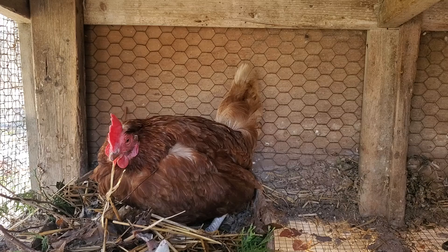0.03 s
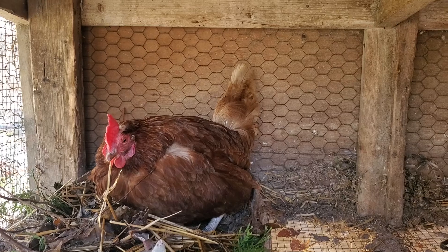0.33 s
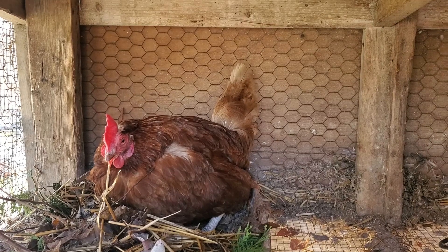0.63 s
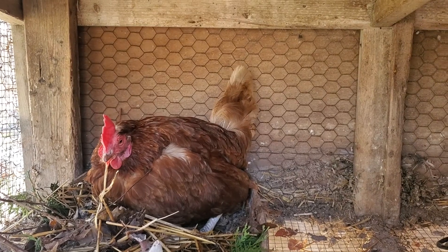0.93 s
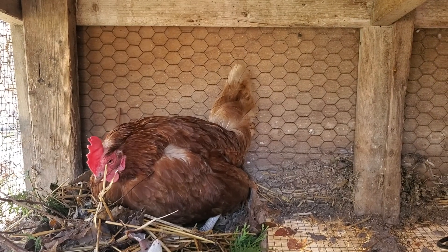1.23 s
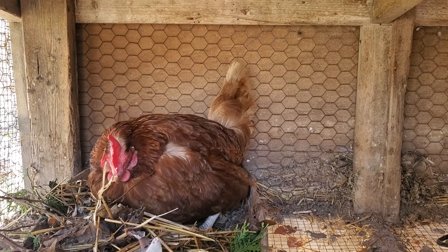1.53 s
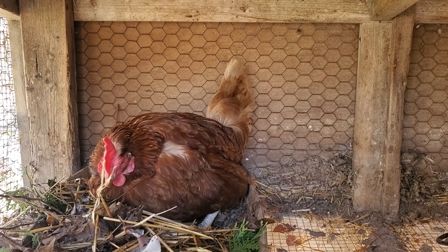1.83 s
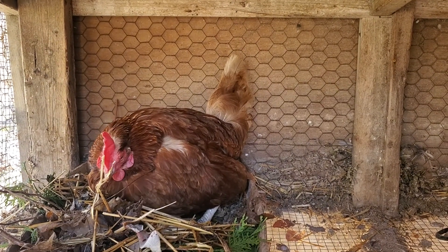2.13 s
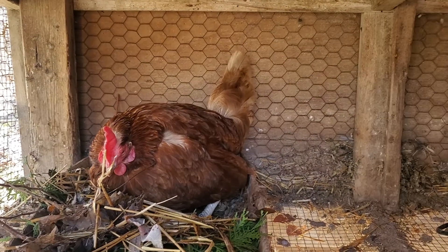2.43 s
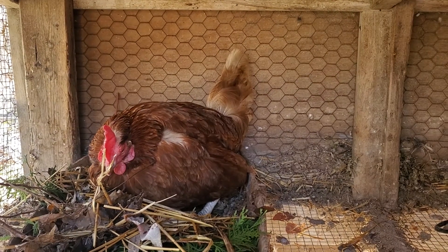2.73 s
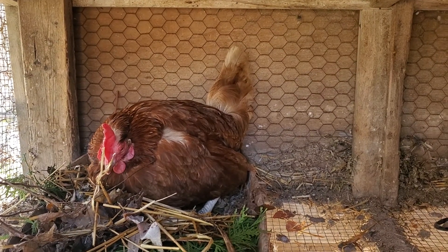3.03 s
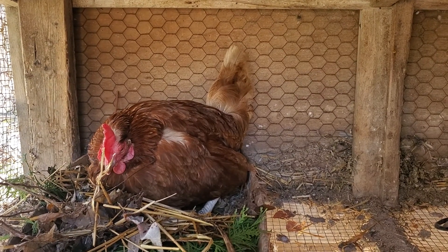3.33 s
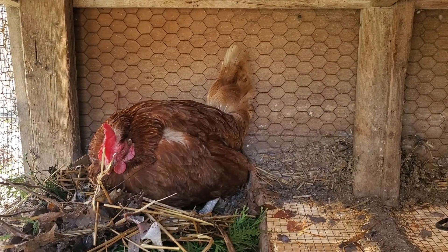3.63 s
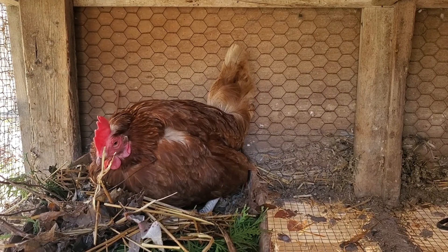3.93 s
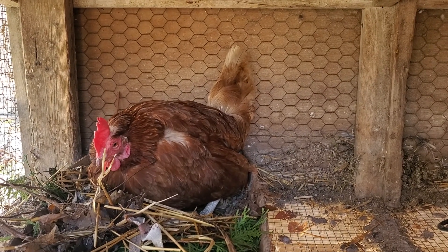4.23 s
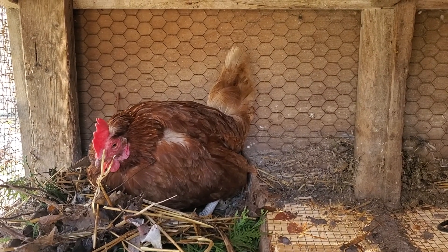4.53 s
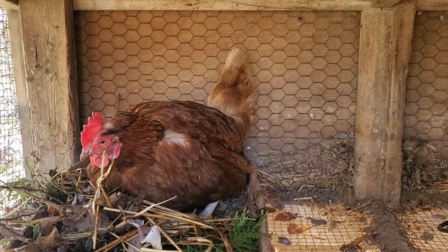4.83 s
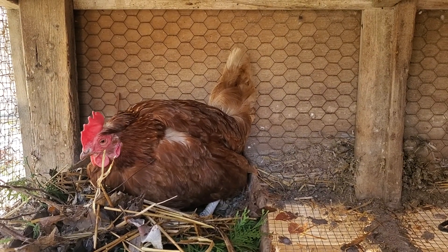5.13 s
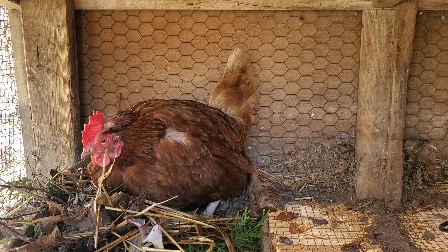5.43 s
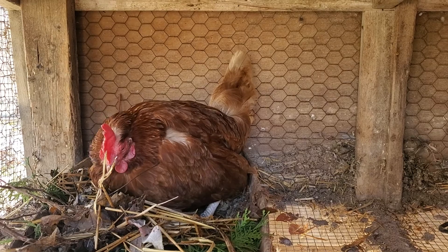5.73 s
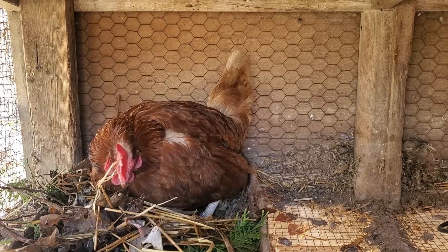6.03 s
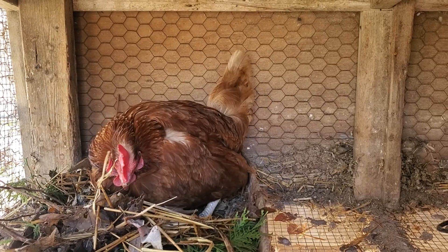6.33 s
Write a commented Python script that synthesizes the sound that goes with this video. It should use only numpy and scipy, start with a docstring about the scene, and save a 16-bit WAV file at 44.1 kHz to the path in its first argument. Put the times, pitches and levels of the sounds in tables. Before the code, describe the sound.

Heard from close to a straw nest in an open coop, a hen makes small dry ticks and soft feather rustles, with one brief creak near the start. A wild bird rasps a few times, then the hen settles with a short burst of crunching straw and snapping stalks. Behind it all, a far engine hums and rumbles, wavering in strength, while faint whistles and peeps echo from the trees.

```python
"""A hen in her nest

A hen settles in an open wooden coop. Straw crunches under her weight, her feathers brush over it,
stalks tick and snap as she tugs at them, and something dry creaks once. A distant engine drones low,
with a faint hum and a wash of noise above it. Wild birds whistle and rasp, echoing in the trees."""
import sys
import numpy as np
from scipy import signal
from scipy.fft import rfft, irfft, next_fast_len
from scipy.io import wavfile
from scipy.ndimage import uniform_filter1d

SR = 44100
rng = np.random.default_rng(int(sys.argv[2]) if len(sys.argv) > 2 else 0)


def to_wav(sig):
    """Store sig (one row per channel, or 1-D mono) as 16-bit WAV at the path in sys.argv[1].

    Samples outside -1..1 are clipped; the rate is SR.
    """
    pcm = np.clip(np.atleast_2d(sig), -1, 1) * 32767
    pcm = np.round(pcm).astype(np.int16)
    wavfile.write(sys.argv[1], SR, pcm.T)  # frames by channels


N = 281799
TIME = np.arange(N) / SR


def from_db(db):
    """Turn decibels into a number to multiply by."""
    return 10 ** (np.asarray(db) / 20)


def rms_one(x):
    """Scale a signal so that its average strength (rms) is 1."""
    return x / np.sqrt(np.mean(x ** 2) + 1e-20)


def in_time(rows):
    """Join a table's points in time with straight lines, one curve per column."""
    times, *columns = np.transpose(rows)
    return [np.interp(TIME, times, column) for column in columns]


def at_hz(points, hz):
    """Read between a table's frequencies, giving each octave equal room."""
    known_hz, values = np.transpose(points)
    return np.interp(np.log(hz + 1e-9), np.log(known_hz), values)


def panned(pan_db):
    """Left and right gains; a positive pan is louder on the left."""
    return from_db(np.array([[.5], [-.5]]) * pan_db)


def left_first(x, lag_samples=12):
    """Sound from the coop's open side reaches the left microphone just before the right."""
    left, right = np.broadcast_to(x, (2, N))
    return np.array([left, np.roll(right, lag_samples)])


def cut(x, hz, kind, order=2):
    """Keep the "low" or the "high" side of a frequency."""
    return signal.sosfilt(signal.butter(order, hz, kind, fs=SR, output="sos"), x + 1e-18)


def drift(rate):
    """A smooth random wobble of about size 1, changing about rate times a second."""
    size = next_fast_len(N // 8 + 1)   # every eighth sample is enough
    hz = np.arange(size // 2 + 1) * SR / (8 * size)
    smooth = irfft(rfft(rng.standard_normal(size)) / (1 + (hz / rate) ** 2), size)
    return np.interp(TIME, np.arange(size) * 8 / SR, rms_one(smooth))


def coloured(x, spectrum):
    """Shape a signal's bass and treble by a table; strength 1."""
    size = next_fast_len(N)
    gain = from_db(at_hz(spectrum, np.arange(size // 2 + 1) * SR / size))
    return rms_one(irfft(rfft(x, size) * gain, size)[..., :N])


def ring(clicks, hz, t60):
    """Each click starts a tone that fades by 60 dB in t60 seconds."""
    decay, step = from_db(-60 / (t60 * SR)), 2 * np.pi * hz / SR
    return signal.lfilter([0, np.sin(step)], [1, -2 * decay * np.cos(step), decay ** 2], clicks + 1e-18)


def clicks_at(rows):
    """One click for each (time [s], level [dB]) row."""
    out = np.zeros(N)
    for s, db in rows:
        out[round(s * SR)] = from_db(db)
    return out


def echoes(x, t60):
    """A blur of reflections, different at each ear, fading by 60 dB in t60 seconds."""
    t = TIME[:int(t60 * SR) + 2]
    tail = rng.standard_normal((2, len(t))) * from_db(-60 * t / t60)
    tail /= np.sqrt(np.sum(tail ** 2) / 2)
    return signal.fftconvolve(np.atleast_2d(x), tail, axes=-1)[:, :N]


def crackle(per_s, spread_db, shared):
    """Fibres slip at random in clicks of uneven size; shared is the part that both ears hear."""
    sizes = from_db(spread_db * np.minimum(rng.exponential(1, (3, N)), 3)) * rng.choice([-1, 1], (3, N))
    slips = sizes * (rng.random((3, N)) < per_s / SR)
    return rms_one(np.sqrt(shared) * left_first(slips[0]) + np.sqrt(1 - shared) * slips[1:])


# How alike the two ears hear the background: (frequency [Hz], likeness [0-1])
EAR_LIKENESS = [(50, .999), (125, 0.95), (250, 1), (500, 0.84), (1000, 0.44), (3000, 0.3), (12000, 0.14)]

def surrounding_noise(spectrum):
    """Noise from all around: alike at both ears in the bass, mostly unrelated in the treble."""
    hz = np.arange(N // 2 + 1) * SR / N
    mid, side = rfft(rng.standard_normal((2, N)))
    alike = at_hz(EAR_LIKENESS, hz)
    both = np.sqrt(1 + alike) * mid + np.sqrt(1 - alike) * side * [[1], [-1]]
    return rms_one(irfft(both * from_db(at_hz(spectrum, hz)), N))


def gain_rise_db(depth_db=14.5, rise_s=2):
    """The recorder's gain climbs to 0 dB at the start, fading the background in."""
    return depth_db * np.minimum(TIME / rise_s - 1, 0)


# How fast the engine turns: (time [s], cycle rate [Hz])
ENGINE_SPEED = [(0.1, 18.55), (1.1, 18.3), (2.0, 17.62), (3.2, 16.95), (4.9, 17.55), (5.4, 17.85),
                (6.39, 17.62)]
# How loud it is: (time [s], firing tone [dB], weaker tones [dB])
ENGINE_LEVELS = [(0.1, -44.5, -47), (0.7, -44, -47), (1.25, -32, -38.5), (1.6, -37.5, -41),
                 (2.9, -34.5, -43), (3.45, -30, -37.5), (4.4, -27.5, -38), (5.2, -32.5, -40),
                 (5.55, -28.5, -43.5), (6.05, -45, -44)]
# Its weaker tones: (pitch [times the cycle rate], relative level [dB])
ENGINE_TONES = [(3, -13), (4, -0.5), (6, -6.5), (7, -7.5), (8, -10.5), (9, -10.5), (10, -14.5), (11, -17.5),
                (12, -14.5), (13, -19), (14, -24.5), (15, -22.5)]
# The shape of its rumble: (frequency [Hz], relative level [dB])
RUMBLE_SPECTRUM = [(20, -23.5), (31, -13), (40, -7), (52, 4.5), (75, 2.5), (100, 2), (130, -4.5),
                   (200, -15), (270, -20.5), (380, -27.5), (600, -65.5)]

def engine(firings_per_cycle=5, waver_db=4.5, rumble_db=-36.5):
    """An engine drones over a rumble; the long way through the air makes its weaker tones waver."""
    cycle_hz, = in_time(ENGINE_SPEED)
    firing_db, weaker_db = in_time(ENGINE_LEVELS)
    turn = 2 * np.pi * np.cumsum(cycle_hz) / SR
    tones = from_db(firing_db) * np.sin(firings_per_cycle * turn)
    for multiple, db in ENGINE_TONES:
        wander = 0.15 * drift(0.56) + rng.uniform(0, 2 * np.pi)
        tones += from_db(weaker_db + db + waver_db * drift(1.54)) * np.sin(multiple * turn + wander)
    rumble = surrounding_noise(RUMBLE_SPECTRUM)
    rumble /= np.sqrt(uniform_filter1d(np.mean(rumble ** 2, axis=0), SR // 4))   # even out its level
    return left_first(np.sqrt(2) * tones + from_db(rumble_db + 0.83 * gain_rise_db()) * rumble)


# The tones of the faint hum: (pitch [Hz], level [dB])
HUM_TONES = [(373.7, -64.5), (747.8, -72.5), (1121, -72.5)]
# The shapes of the far wash and the high hiss: (frequency [Hz], relative level [dB])
WASH_SPECTRUM = [(250, -32.5), (400, 4.5), (580, -3), (780, 1.5), (1050, -1), (1700, -5), (2300, -9.5),
                 (2950, -9), (3700, -18.5), (5100, -23), (8000, -45), (16000, -61.5)]
HISS_SPECTRUM = [(3500, -25), (5000, -13), (5900, -2.5), (6700, 3), (7600, -8), (9300, -17.5),
                 (12000, -13.5), (16000, -13)]

def outdoors(wash_db=-57, hiss_db=-79, ease_db_per_s=0.61):
    """A far wash of noise, a wavering hum and a thin hiss, fading in as the recorder's gain rises."""
    far_db = gain_rise_db() - ease_db_per_s * (TIME - TIME.mean())
    hum = sum(from_db(db + 3 * drift(3)) * np.sin(2 * np.pi * hz * TIME + 0.42 * drift(5))
              for hz, db in HUM_TONES)
    hiss = from_db(hiss_db + 1.1 * gain_rise_db()) * surrounding_noise(HISS_SPECTRUM) * panned(12)
    wash = from_db(wash_db) * surrounding_noise(WASH_SPECTRUM)
    return left_first(from_db(far_db) * (wash + np.sqrt(2) * hum) + hiss)


def sing(notes, overtones=(), rasp_hz=450, hoarseness=0.91, flutter_hz=900):
    """A bird's voice: gliding tones whose pitch shakes; any overtones flutter hoarsely."""
    out, shake = np.zeros((2, N)), drift(rasp_hz)
    flutter = rms_one(1 + hoarseness * drift(flutter_hz))
    for s, length, first, middle, last, db, rasp, pan_db in notes:
        span = slice(int(s * SR), int(s * SR) + int(length * SR))
        progress = np.linspace(0, 1, span.stop - span.start)
        glide_hz = np.polyval(np.polyfit([0, .5, 1], [first, middle, last], 2), progress)
        phase = 2 * np.pi * np.cumsum(glide_hz * (1 + rasp * shake[span])) / SR
        upper = sum(gain * np.sin(k * phase) for k, gain in enumerate(overtones, 2))
        loudness = np.sqrt(2 * np.abs(np.sin(np.pi * progress))) * from_db(db)
        out[:, span] += loudness * (np.sin(phase) + flutter[span] * upper) * panned(pan_db)
    return out


# Five bird calls of two notes each, one row per note:
# (delay [s], length [s], first pitch [Hz], middle pitch [Hz], last pitch [Hz], rasp [share of pitch])
WHISTLE_NOTES = [(0, .15, 3443, 3320, 3316, 0.0038), (.18, 0.18, 3318, 3260, 3333, 0.0025)]
SLUR_NOTES = [(0, .145, 3404, 3940, 4005, 0.018), (.06, .042, 4260, 4375, 4400, 0.014)]
PEEP_NOTES = [(0, 0.038, 4105, 4816, 4820, 0.044), (.09, 0.014, 5040, 4960, 4600, .018)]
LOW_SLUR_NOTES = [(0, .08, 2010, 2212, 2236, 0.032), (.085, .085, 2324, 2315, 2180, 0.057)]
THIN_WHISTLE_NOTES = [(0, .15, 2922, 2875, 2985, .0065), (.215, .08, 2960, 3023, 3050, 0.0091)]
# When each call is sung: (time [s], first note [dB], second note [dB], pan [dB])
WHISTLE_TIMES = [(0.159, -79, -79.5, -20), (2.86, -68, -69.5, -14), (5.19, -68.5, -70.5, -17.5)]
SLUR_TIMES = [(.825, -66, -67, -6), (3.384, -64, -53.5, -4), (5.524, -56.5, -62, -7.5)]
PEEP_TIMES = [(1.17, -58.5, -66.5, -3), (5.903, -54.5, -56, -3)]
LOW_SLUR_TIMES = [(.655, -70, -73, -14), (2.37, -54.5, -59, -2.5), (4.665, -62.5, -65.5, -10)]
THIN_WHISTLE_TIMES = [(3.314, -67, -81, -19.5), (5.664, -71, -72.5, -24)]

def far_birds(direct_db=-6, echo_db=-1):
    """Far birds repeat their calls, and the trees smear them with echoes."""
    songs = [(WHISTLE_NOTES, WHISTLE_TIMES), (SLUR_NOTES, SLUR_TIMES), (PEEP_NOTES, PEEP_TIMES),
             (LOW_SLUR_NOTES, LOW_SLUR_TIMES), (THIN_WHISTLE_NOTES, THIN_WHISTLE_TIMES)]
    notes = []
    for call, times in songs:
        for s, *levels, pan_db in times:
            for (delay, length, *pitches, rasp), db in zip(call, levels):
                notes.append((s + delay, length, *pitches, db, rasp, pan_db))
    song = sing(notes)
    return left_first(from_db(direct_db) * song + from_db(echo_db) * echoes(song, t60=.85))


# The creak's last, late slip: (time [s], level [dB])
LAST_SLIP = [(.678, -49.5)]
# The woody tones each slip sets ringing: (pitch [Hz], relative level [dB], fade time [s])
CREAK_TONES = [(500, -1, 0.003), (970, -1.5, 0.0042), (2120, -9, 0.0081), (3100, -3.5, 0.0061)]

def creak(start_s=.5005, gap_s=.0227, gain_db=-4):
    """Something dry sticks and slips at an even pace, ringing briefly like wood."""
    levels_db = [-45.5] + [-37 - 3.2 * k for k in range(6)]   # a soft slip, then a fading run
    run = [(start_s + k * gap_s, db) for k, db in enumerate(levels_db)]
    slips = clicks_at(run + LAST_SLIP)
    body = sum(ring(slips, hz, t60) * from_db(db + gain_db) for hz, db, t60 in CREAK_TONES)
    return cut(body, 4200, "low", order=4) * panned(-18)


# Feather strokes: (time of peak [s], half length [s], level [dB], crispness [0-1], pan [dB])
FEATHER_STROKES = [(.615, 0.024, -66, 0.34, 0), (0.725, 0.031, -69.5, 0.06, -10),
                   (1.182, 0.075, -68.5, 0.13, 2), (1.483, 0.05, -64, 0, -2),
                   (2.273, 0.045, -74.5, 0.46, 19), (2.76, 0.035, -67.5, 0.6, 21.5),
                   (3.656, 0.0069, -49, 0.9, 2), (3.75, 0.016, -46, 0.6, 0), (3.911, 0.012, -46.5, 0.6, -1),
                   (4.12, 0.15, -66, 0.74, 6), (5.52, .04, -76, 0.96, 6), (6, 0.015, -68, 1, 9),
                   (6.076, 0.062, -70, 0.9, 8)]
# The shape of their sound: (frequency [Hz], relative level [dB])
FEATHER_SPECTRUM = [(1500, -2.5), (3500, -3), (6000, -2), (9000, -5.5), (12500, 1.5), (16000, -14)]

def feathers(dull_hz=7500):
    """The hen's feathers sweep lightly over the straw, each stroke a blend of dull and crisp."""
    crisp = coloured(crackle(per_s=3200, spread_db=5, shared=.2), FEATHER_SPECTRUM)
    dull = coloured(crackle(per_s=2200, spread_db=6, shared=.24), FEATHER_SPECTRUM)
    dull = cut(dull, dull_hz, "low", order=4)
    out = 0
    for s, half, db, crispness, pan_db in FEATHER_STROKES:
        sweep = from_db(db) * np.exp(-.5 * ((TIME - s) / half) ** 2)
        blend = crispness * crisp + np.sqrt(1 - crispness ** 2) * dull
        out += sweep * blend * panned(pan_db)
    return out


# Small dry ticks: (time [s], level [dB], pan [dB])
STRAW_TICKS = [(0.627, -42, 3), (.678, -43, -3), (0.701, -45, 0), (.740, -39.5, -11), (.769, -42, -11),
               (1.0954, -33.5, 6), (1.513, -38.5, 13), (2.687, -38.5, 14), (3.455, -32, 6),
               (4.529, -32, -3), (5.423, -32, 4)]

def straw_ticks(echo_db=-1):
    """Single straws tick, and the coop's boards throw back a short echo."""
    taps = sum(clicks_at([(s, db)]) * panned(pan_db) for s, db, pan_db in STRAW_TICKS)
    ticks = cut(cut(taps, 1500, "high", order=1), 6500, "low")
    return ticks + from_db(echo_db) * echoes(ticks, t60=0.2)


# Hoarse bird chips and rasps, and last the rough top note of one low slurred call:
# (time [s], length [s], first pitch [Hz], middle pitch [Hz], last pitch [Hz], level [dB],
# rasp [share of pitch], pan [dB])
HOARSE_NOTES = [(1.457, 0.03, 4460, 4030, 4000, -63, 0.04, -15),
                (1.625, 0.18, 2800, 2712, 2954, -55, 0.072, -10.5),
                (1.746, 0.26, 2920, 3033, 3166, -50.5, 0.05, -4),
                (1.867, 0.18, 3610, 3790, 4280, -57, 0.051, -7),
                (2.142, 0.011, 4060, 3980, 4000, -65, 0.059, -17),
                (2.207, 0.011, 3000, 3140, 3000, -64, 0.036, -21),
                (2.375, 0.037, 3030, 3200, 3340, -66, .025, -12)]

def bird_rasps(gain_db=-3.5):
    """Hoarse bird notes with overtones; their short echo makes them sound closer."""
    song = sing(HOARSE_NOTES, overtones=from_db([-12, -29, -30]))
    return left_first(from_db(gain_db) * (song + echoes(song, t60=0.19)))


# Stalks breaking: (time [s], level [dB], splinters compared with wood [dB], fade time [s], pan [dB])
STALK_SNAPS = [(3.551, -38.5, -13, 0.092, -1.5), (3.645, -41, -23, .06, -1),
               (3.962, -35, -4.5, 0.044, -3.5), (4.002, -28, -15, 0.051, 4), (4.008, -38, -17, 0.082, -5),
               (4.353, -48.5, 4.5, 0.11, 0), (4.365, -67.5, 9.5, 0.39, -4)]
# The shapes of a snap's woody and sharp parts: (frequency [Hz], relative level [dB])
WOOD_SPECTRUM = [(300, -13), (480, -9), (680, 1.5), (1000, -2.5), (1650, 9), (1950, 1), (2500, 4),
                 (3100, -3), (4200, -17), (6000, -49), (12000, -27)]
SPLINTER_SPECTRUM = [(1500, -3), (3000, 0), (6500, -9.5), (9000, -15), (12500, -20.5), (16000, -32)]

def stalk_snaps():
    """A stalk breaks in a quickly dying run of splinters, woody below and sharp on top."""
    wood = coloured(crackle(per_s=7000, spread_db=0.5, shared=.7), WOOD_SPECTRUM)
    sharp = coloured(crackle(per_s=9500, spread_db=8, shared=.19), SPLINTER_SPECTRUM)
    out = 0
    for s, db, sharp_db, t60, pan_db in STALK_SNAPS:
        dying = (TIME >= s) * from_db(db - 60 * np.maximum(TIME - s, 0) / t60)
        out += dying * (wood + from_db(sharp_db) * sharp) * panned(pan_db)
    return out


# The hen shifts her weight: (time [s], hold [s], level [dB])
WEIGHT_SHIFTS = [(3.596, 0.13, -40), (3.912, 0.058, -46.5), (4.162, 0.054, -58)]
# The shape of the straw's crunch: (frequency [Hz], relative level [dB])
STRAW_SPECTRUM = [(170, 16.5), (290, 13.5), (480, 0), (720, 3.5), (1200, -2), (2100, -3), (2900, -0.5),
                  (4200, -5.5), (5500, -9), (6700, -11), (8500, -11), (12000, -12), (16000, -21)]
# Which side each part of it leans to: (frequency [Hz], pan [dB])
STRAW_PAN = [(60, -5), (180, -1), (550, 1.5), (1650, -4.5), (4970, -5.5), (15000, 11)]

def straw_crunch(rise_s=0.046, fade_db_per_s=120.5, clump_db=2.5):
    """Straw crunches in clumps as each shift of weight presses on it, holds and lets go."""
    crunch = coloured(crackle(per_s=2200, spread_db=-1.5, shared=.39), STRAW_SPECTRUM)
    hz = np.arange(N // 2 + 1) * SR / N
    crunch = irfft(rfft(crunch) * panned(at_hz(STRAW_PAN, hz)), N)
    pressure = 0
    for s, hold, db in WEIGHT_SHIFTS:
        rise = np.clip(1 + (TIME - s) / rise_s, 0, 1)
        pressure += rise * from_db(db - fade_db_per_s * np.maximum(TIME - s - hold, 0))
    return crunch * pressure * from_db(clump_db * drift(65))


def scene():
    """The nest close by, with the engine and the birds farther off."""
    background = engine() + outdoors()
    nest = straw_crunch() + feathers() + stalk_snaps() + straw_ticks() + creak()
    return background + nest + far_birds() + bird_rasps()


def record(dry, start_s=.106, fade_s=.006, top_hz=15700):
    """The sound starts after a moment and ends in a quick fade; the highest treble is cut."""
    gate = (TIME >= start_s) * np.clip((TIME[-1] - TIME) / fade_s, 0, 1)
    return signal.sosfilt(signal.ellip(10, .1, 80, top_hz, fs=SR, output="sos"), dry * gate)


dry = scene()
out = record(dry)
to_wav(out)
```